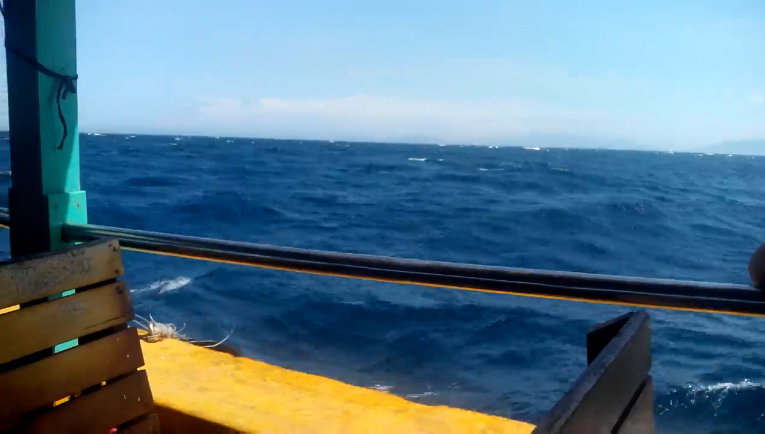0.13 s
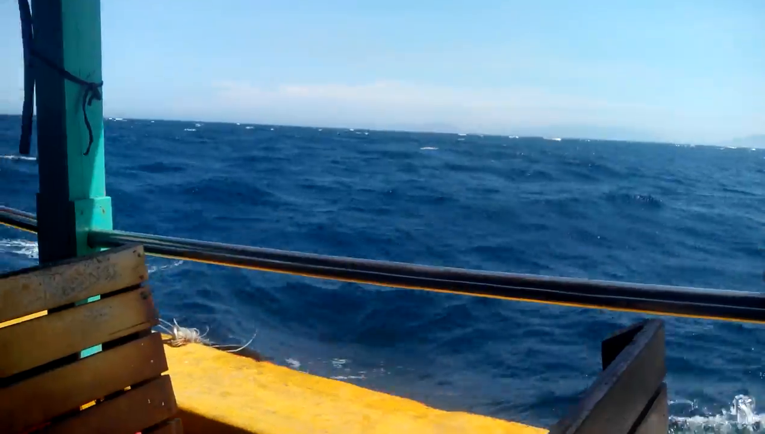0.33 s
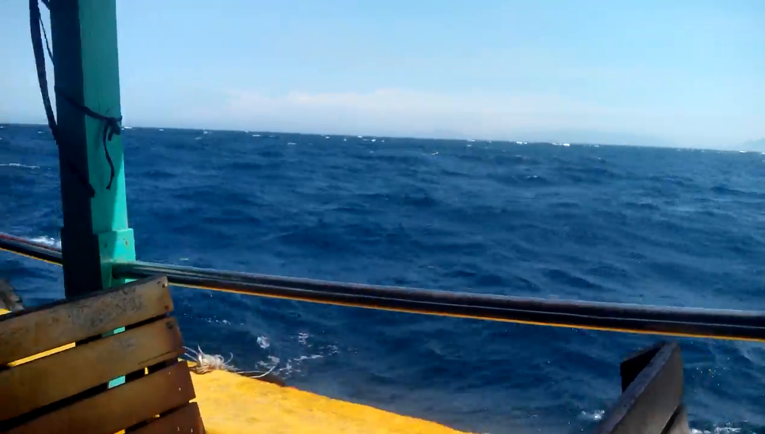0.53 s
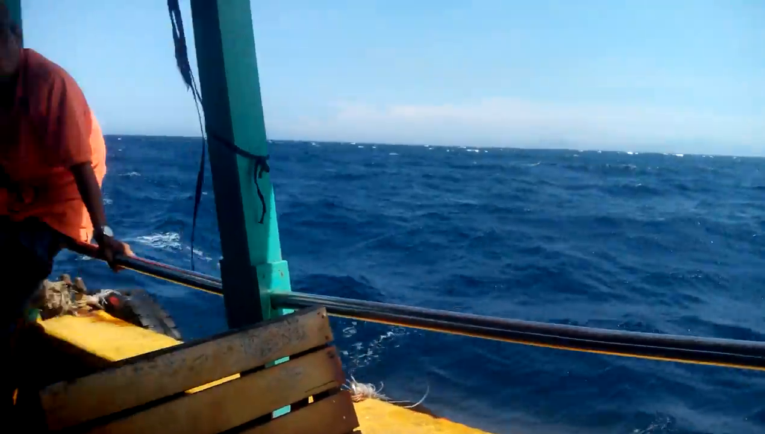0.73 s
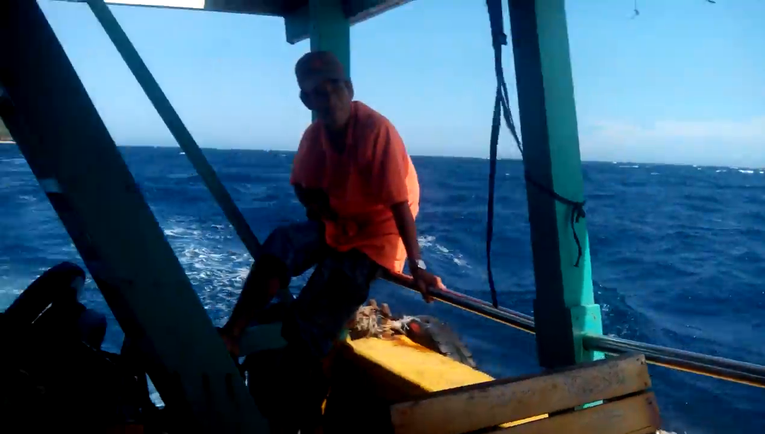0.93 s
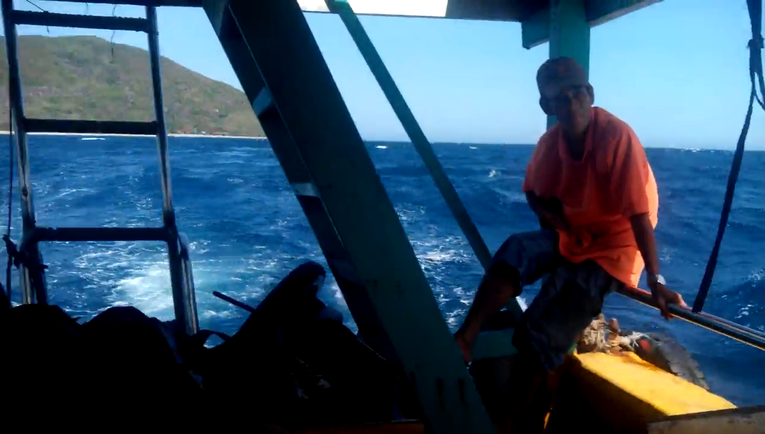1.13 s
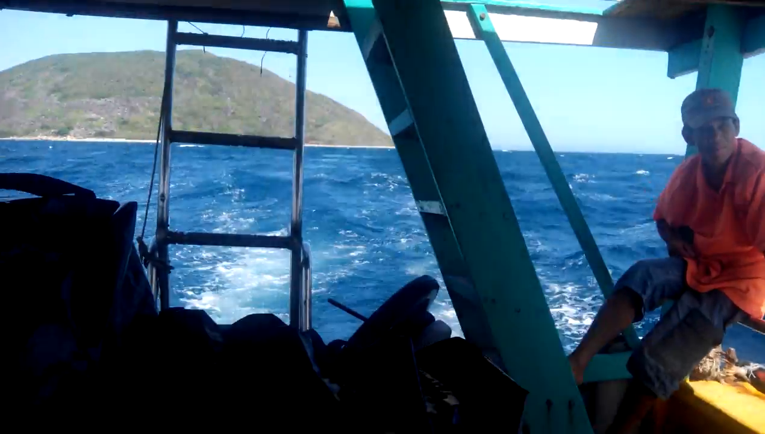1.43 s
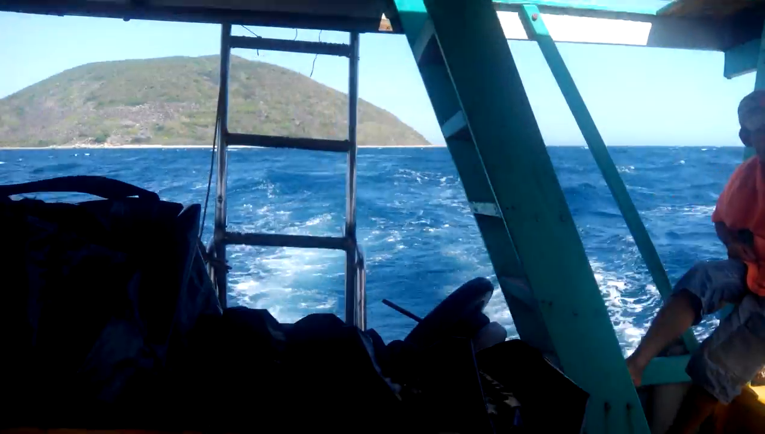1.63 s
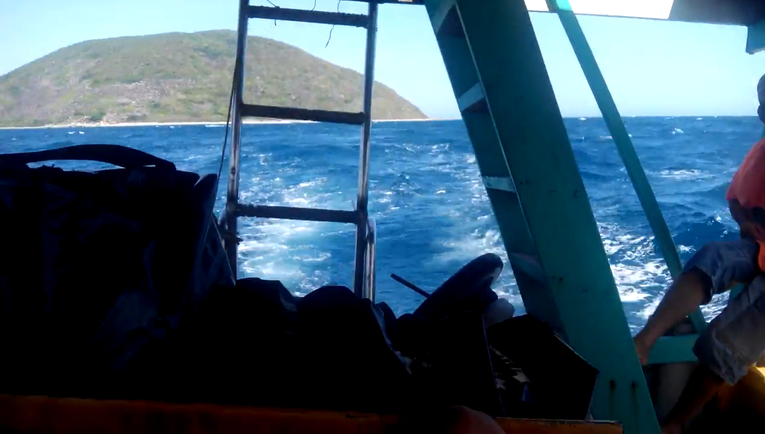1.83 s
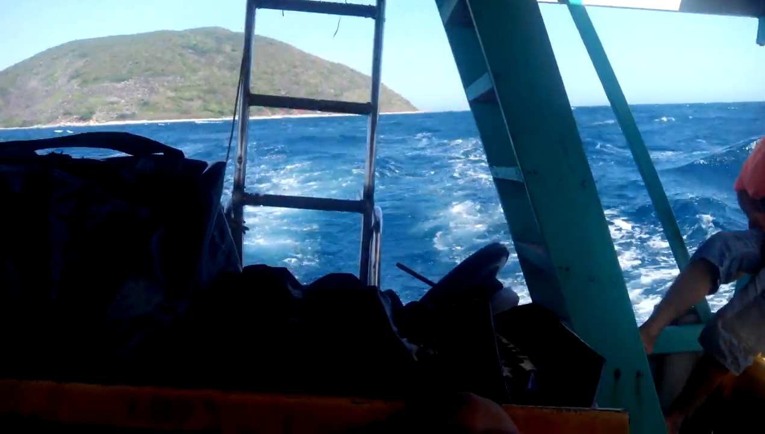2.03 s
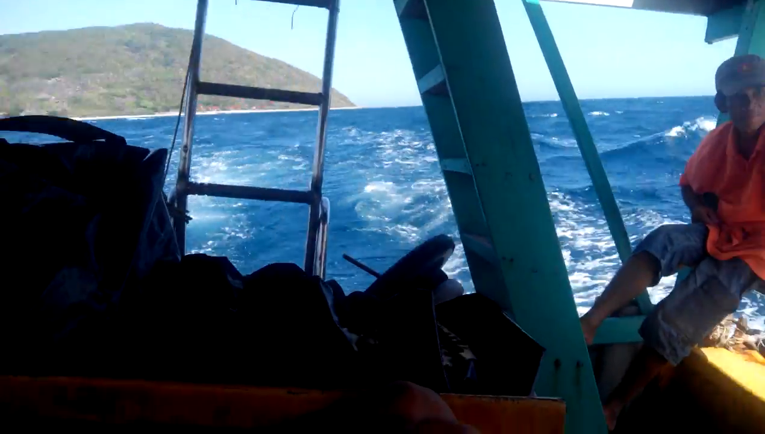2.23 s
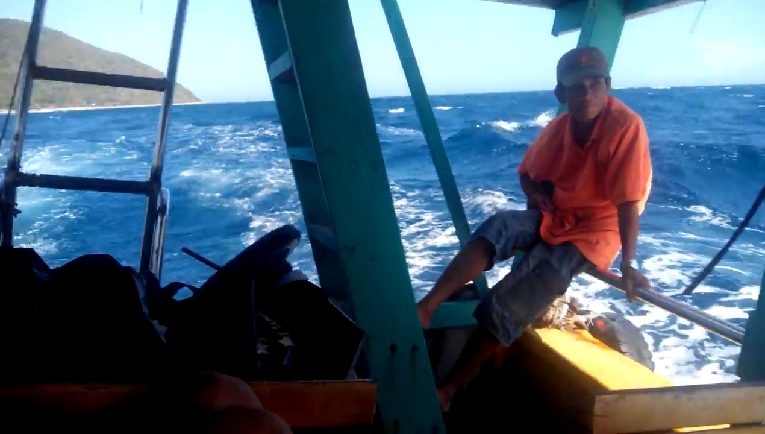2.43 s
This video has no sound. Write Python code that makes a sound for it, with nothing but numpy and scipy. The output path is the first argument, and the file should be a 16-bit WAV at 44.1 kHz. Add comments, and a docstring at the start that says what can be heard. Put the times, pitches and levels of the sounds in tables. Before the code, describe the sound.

Loud steady boat diesel rumble with rattling planks, buffeting low wind and foamy washing water

```python
"""A slow six-cylinder diesel drones through the hull of a wooden boat: sines on multiples of its cycle.
Each firing shakes noise through resonances of the planking and engine block, with a dry clatter.
A wavering sine is the propeller's throb; filtered noise gives buffeting wind, washing wake and fizzing foam.
Rings of the fittings, a deck tick and a falling whine pass; the drone's balance shifts as the listener
turns from the side to the stern."""
import sys
import numpy as np
from scipy import signal
from scipy.fft import rfft, irfft
from scipy.io import wavfile
from scipy.ndimage import uniform_filter1d

SR = 44100
rng = np.random.default_rng(int(sys.argv[2]) if len(sys.argv) > 2 else 0)


def to_wav(s):
    """Save 16-bit WAV."""
    ch = np.atleast_2d(s).T  # columns
    pcm = np.round(np.clip(ch, -1, 1) * 32767)  # PCM
    wavfile.write(sys.argv[1], SR, pcm.astype(np.int16))


N = 113778

# Wind spectrum at the microphone: pitch_hz, relative_density_db
WIND_SPECTRUM = [(15, -40.5), (27, -28), (36, -6), (45, -3), (70, -3), (130, -1), (220, -7), (400, -12),
                 (900, -27.5), (3000, -70.5)]
# Wake spectrum: pitch_hz, relative_density_db
WASH_SPECTRUM = [(200, -12.5), (500, 1), (1100, -6.5), (1700, -7), (2600, -17.5), (3600, -27), (4700, -31),
                 (6300, -37), (8500, -45), (11000, -47.5), (15500, -62)]
# Wake level over time: time_s, level_db
WASH_LEVELS = [(.15, -33.5), (.5, -34), (1.0, -33), (1.35, -32.5), (1.75, -33.5), (2.1, -33), (2.3, -35.5),
               (2.58, -33.5)]
# Falling whine: time_s, pitch_hz, level_db
WHINE_GLIDE = [(2.39, 945, -48), (2.438, 922, -27.5), (2.492, 898, -28.5), (2.58, 876, -29)]
# Deck ticks: start_s, peak_level_db
DECK_TICKS = [(.293, -43)]
# Louder rings of the fittings: centre_s, length_s, pitch_hz, width_hz, peak_level_db
FITTING_RINGS = [(0.551, 0.014, 1067, 110, -23), (0.917, 0.054, 995, 40, -29.5),
                 (1.962, 0.088, 906, 50.7, -29), (2.233, 0.0097, 1240, 128, -24)]
# Firing rate of the whole engine: time_s, rate_hz
FIRING_RATE = [(.15, 46.3), (.5, 46.64), (.9, 46.66), (1.3, 46.43), (1.7, 46.18), (2.1, 46.09),
               (2.5, 46.38)]
# Strength of each cylinder in firing order: relative_level_db
CYLINDER_STRENGTH = [2, 0.017, 0.83, -0.99, -1.1, -2.3]
# Planking resonances: pitch_hz, width_hz, relative_level_db
PLANK_MODES = [(173, 99, -3), (217.4, 36, 3.5), (341.4, 72, -1.5), (404.5, 50, -4), (525, 71, -8.5),
               (625.4, 33, -3.5), (717, 42, -5.5)]
# Engine block and fittings resonances: pitch_hz, width_hz, relative_level_db
BLOCK_MODES = [(798.4, 45, -4.5), (875.7, 49, -4.5), (960, 48, -1), (1014, 44, -2), (1070, 82, -4),
               (1170, 79, -5.5), (1307, 132, -10.5), (1430, 168, -16)]
# Injector and valve clatter spectrum: pitch_hz, relative_density_db
CLATTER_SPECTRUM = [(300, 2.5), (600, 6.5), (1200, -7.5), (1600, -18.5), (2000, -13.5), (2800, -26),
                    (3600, -38.5), (5000, -46.5), (9000, -55), (16000, -53)]
# Drone partials: multiple_of_engine_cycle, side_level_db, stern_level_db
DRONE_PARTIALS = [(6, -33, -30), (7, -38, -44), (10, -29, -31), (12, -19, -22.8), (15, -46, -31),
                  (18, -31, -38), (22, -37, -36), (24, -30.5, -31.5), (26, -43, -37), (27, -38, -41),
                  (30, -29.5, -33), (32, -34, -34), (42, -42, -39), (44, -43, -40), (46, -37, -37),
                  (52, -42, -43)]

START_S, FADE_IN_S, TOP_HZ = .142, .004, 15700
WIND_DB, GUST_SPREAD_DB = -25, 1.0
FIZZ_DB, POPS_PER_S = -72, 1500
TICK_HZ, TICK_WIDTH_HZ, TICK_DECAY_S = 5700, 1600, .0023
PROP_HZ, PROP_DB, PROP_WAVER_DB = 72.3, -29, 3
CYLINDERS, MAX_FIRINGS = 6, 126
KNOCK_DECAY_S, KNOCK_SCATTER_DB, KNOCK_JITTER_S = .021, 1.46, .0011
KNOCK_FLOOR = .56  # steady force between firings; a 0 dB knock adds 1
PLANKS_DB, BLOCK_DB, CLATTER_DB = -22.5, -25.5, -29.5
DRONE_WAVER_DB, DRONE_SWAY_RAD = 1.0, .1
TURN_S, TURN_LENGTH_S = .97, .5  # middle and length of the turn to the stern


def undb(db):
    """Decibels to gain."""
    return 10 ** (np.asarray(db) / 20)


def level(x, db):
    """Set the rms level."""
    return x * undb(db) / np.sqrt(np.mean(x ** 2))


def noise():
    """White noise."""
    return rng.standard_normal(N)


def walk(rate_hz):
    """Random levels held 1 / rate_hz s and smoothed twice; spread near 1."""
    hold = int(SR / rate_hz)
    held = rng.standard_normal(400)[np.arange(N) // hold]
    return np.sqrt(2) * uniform_filter1d(uniform_filter1d(held, hold), hold)


def colour(x, points):
    """Filter by a (Hz, dB) curve, interpolated over log frequency."""
    hz, db = np.array(points, float).T
    bins_hz = np.maximum(np.fft.rfftfreq(N, 1 / SR), 1)
    gain = undb(np.interp(np.log(bins_hz), np.log(hz), db))
    return irfft(rfft(x) * gain, N)


def ring(x, hz, width_hz):
    """A resonance with steep skirts (two passes), gain 1 at its centre."""
    b, a = signal.iirpeak(min(hz, SR / 2 - 1), hz / width_hz / np.sqrt(2), fs=SR)
    return signal.lfilter(b, a, signal.lfilter(b, a, x))


def wind():
    """Low noise buffets the microphone in quick random gusts."""
    gusts = undb(GUST_SPREAD_DB * walk(14))
    return level(colour(noise() * gusts, WIND_SPECTRUM), WIND_DB)


def wake(t):
    """Churned water is noise of slowly varying level; bursting foam adds sparse pops."""
    time_s, level_db = np.array(WASH_LEVELS).T
    wash = level(colour(noise(), WASH_SPECTRUM), 0) * undb(np.interp(t, time_s, level_db))
    bursts = rng.random(N) < POPS_PER_S / SR
    pops = noise() * bursts * undb(2.5 * rng.exponential(size=N))
    return wash + level(ring(pops, hz=5000, width_hz=4500), FIZZ_DB)


def whine(t):
    """A thin, slightly unsteady tone that slides down."""
    time_s, hz, db = np.array(WHINE_GLIDE).T
    pitch_hz = np.interp(t, time_s, hz) * (1 + .00514 * walk(62))
    tone = np.sqrt(2) * np.sin(2 * np.pi * np.cumsum(pitch_hz) / SR)
    return tone * undb(np.interp(t, time_s, db)) * (t > time_s[0])


def ticks(t):
    """A light, bright tick: narrow noise that starts at once and decays fast."""
    envelope = 0
    for start_s, db in DECK_TICKS:
        decay = np.exp(-np.abs(t - start_s) / TICK_DECAY_S)
        envelope = envelope + undb(db) * (t >= start_s) * decay
    return envelope * level(ring(noise(), TICK_HZ, TICK_WIDTH_HZ), 0)


def fittings(t):
    """Fittings ring out over the rattle: resonant noise in bell-shaped swells."""
    out = 0
    for centre_s, length_s, hz, width_hz, db in FITTING_RINGS:
        swell = np.exp(-.5 * ((t - centre_s) / length_s) ** 2)
        out = out + level(ring(noise(), hz, width_hz), db) * swell
    return out


def propeller():
    """A low throb: one sine, wavering at random in pitch and level."""
    pitch_hz = PROP_HZ * (1 + .014 * walk(5.33))
    phase = 2 * np.pi * (np.cumsum(pitch_hz) / SR + rng.random())
    return level(np.sin(phase) * undb(PROP_WAVER_DB * walk(9.4)), PROP_DB)


def knocks(cycle):
    """Force of the firings: a jump at each, then a fast decay; the cylinders are unequal."""
    late, size = rng.standard_normal((MAX_FIRINGS, 2)).T
    number = np.arange(MAX_FIRINGS)
    jitter = (late * KNOCK_JITTER_S * SR).astype(int)
    at = np.searchsorted(cycle * CYLINDERS, number) + jitter
    gain = undb(np.resize(CYLINDER_STRENGTH, MAX_FIRINGS) + KNOCK_SCATTER_DB * size)
    heard = (at >= 0) & (at < N) & (number < cycle[-1] * CYLINDERS)
    hits = np.bincount(at[heard], gain[heard], N)
    decay = np.exp(-1 / (KNOCK_DECAY_S * SR))
    return KNOCK_FLOOR + signal.lfilter([1], [1, -decay], hits)


def resonate(force, modes):
    """Sum of resonances, each shaken by its own noise under the shared force."""
    return sum(undb(db) * ring(force * noise(), hz, width_hz) for hz, width_hz, db in modes)


def rattle(cycle):
    """Firings shake the planks, ring the block and clatter in the injectors and valves."""
    force = knocks(cycle)
    planks = level(resonate(force, PLANK_MODES), PLANKS_DB)
    block = level(resonate(force, BLOCK_MODES), BLOCK_DB)
    clatter = level(colour(force * noise(), CLATTER_SPECTRUM), CLATTER_DB)
    return planks + block + clatter


def drone(cycle, astern):
    """Exhaust and hull hum on multiples of the engine cycle; the balance shifts as the listener turns."""
    out = 0
    for multiple, side_db, stern_db in DRONE_PARTIALS:
        phase = 2 * np.pi * (multiple * cycle + rng.random()) + DRONE_SWAY_RAD * walk(6)
        level_db = side_db + (stern_db - side_db) * astern + DRONE_WAVER_DB * walk(7.35)
        out = out + np.sqrt(2) * np.sin(phase) * undb(level_db)
    return out


def scene():
    """Wind, water, propeller and engine at the listener."""
    t = np.arange(N) / SR
    time_s, rate_hz = np.array(FIRING_RATE).T
    cycle = np.cumsum(np.interp(t, time_s, rate_hz)) / SR / CYLINDERS  # engine cycles elapsed
    astern = np.clip((t - TURN_S) / TURN_LENGTH_S + .5, 0, 1)  # 0 side, 1 stern
    surroundings = wind() + wake(t)
    details = whine(t) + ticks(t) + fittings(t)
    machinery = propeller() + rattle(cycle) + drone(cycle, astern)
    return (surroundings + details + machinery)[None]


def record(dry):
    """The sound cuts in after a short silence; a steep low-pass removes the top."""
    live = np.clip((np.arange(N) / SR - START_S) / FADE_IN_S, 0, 1)
    low_pass = signal.ellip(8, .2, 70, TOP_HZ, fs=SR, output="sos")
    return signal.sosfilt(low_pass, dry * live)


dry = scene()
out = record(dry)
to_wav(out)
```